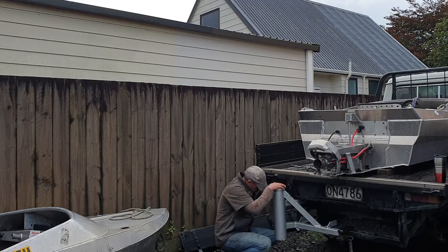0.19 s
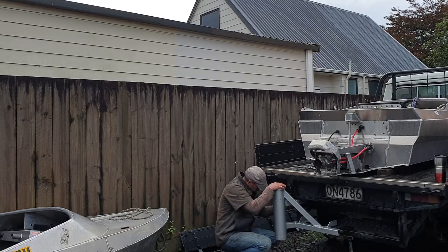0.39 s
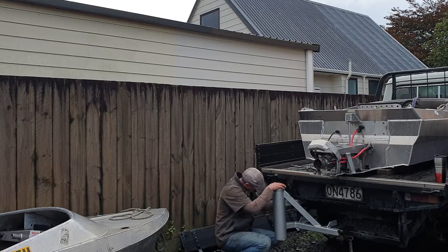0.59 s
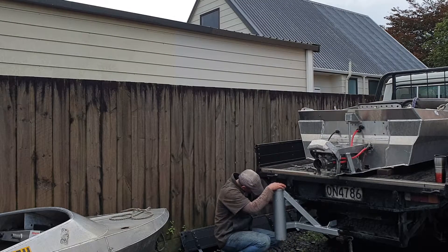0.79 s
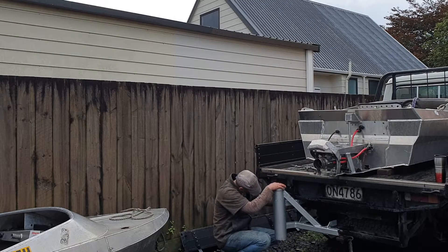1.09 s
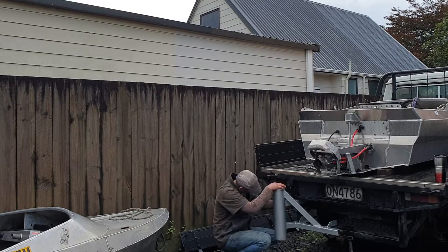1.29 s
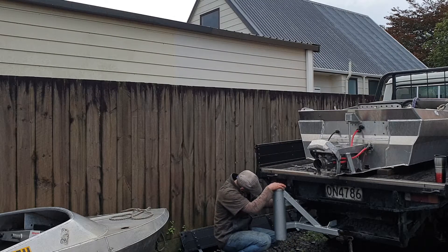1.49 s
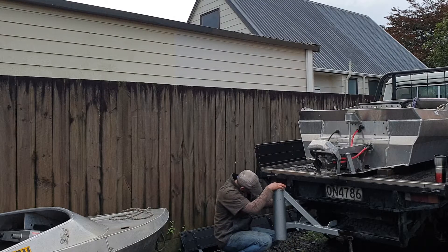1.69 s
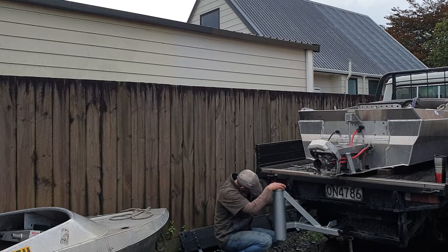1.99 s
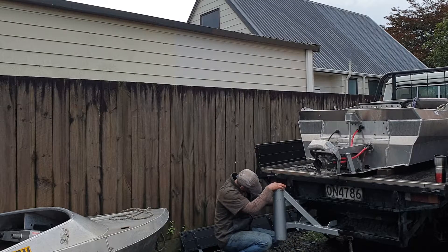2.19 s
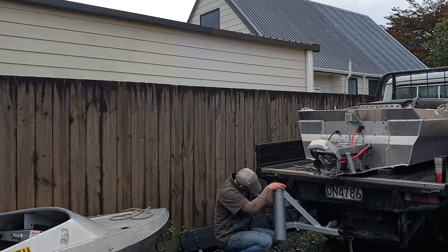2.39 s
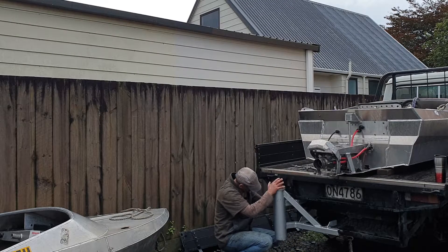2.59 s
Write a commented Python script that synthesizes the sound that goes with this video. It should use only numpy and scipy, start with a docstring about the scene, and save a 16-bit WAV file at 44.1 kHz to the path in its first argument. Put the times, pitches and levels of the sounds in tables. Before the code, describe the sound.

Brief piercing metal squeaks come in uneven bursts, first slightly lower, then higher, with grinding, low thuds and light knocks between pauses; outdoors, short echoes from fence and walls, faint distant town rumble, heard from a few metres.

```python
"""A fenced yard: a steel post is worked to and fro by hand in its socket, a few metres away.
The dry joint sticks and slips, locking onto high modes of the tube: squeaks, built from jittered harmonics.
Each stroke grinds and thuds (random clicks through resonances), with knocks and two small metal ticks.
Fence and house walls give a short tail (decaying noise) over a distant town rumble (shaped noise)."""
import sys
import numpy as np
from scipy import signal
from scipy.fft import rfft, irfft
from scipy.io import wavfile
from scipy.ndimage import uniform_filter1d

SR = 44100
rng = np.random.default_rng(int(sys.argv[2]) if len(sys.argv) > 2 else 0)


def natural_amplitude(level_db):
    """Convert a level in decibels to a linear amplitude factor, elementwise."""
    exponent = np.asarray(level_db, float) / 20
    return 10 ** exponent


def wav_out(sig):
    """Save sig, one row per channel (or a flat mono array), as 16-bit PCM at SR to the path in sys.argv[1]."""
    wavfile.write(sys.argv[1], SR, np.round(np.clip(np.atleast_2d(sig).T, -1, 1) * 32767).astype(np.int16))


N = 119070
T = np.arange(N) / SR

# Town spectrum, relative: pitch_hz, density_db (per Hz)
TOWN_SPECTRUM = [(21, -28.5), (36, -4), (83, 2), (157, -9.5), (183, -7.5), (517, -16), (777, -16),
                 (1390, -32.5), (1620, -32), (4590, -42.5), (5920, -41), (10300, -52.5), (15500, -42)]
# Town balance: pitch_hz, left_minus_right_db
TOWN_BALANCE = [(60, 5), (110, 1.5), (200, 3.5), (700, 5.5), (2380, -4.5), (8120, 14), (15000, 2)]
# Town width: pitch_hz, likeness of left and right (-1 to 1)
TOWN_LIKENESS = [(60, 0.92), (130, 0.95), (290, 0.74), (640, 0.21), (1410, -0.14), (3100, -0.33),
                 (6820, 0.3), (15000, 0.45)]
# Microphone response to the post and its echoes: pitch_hz, gain_db
MIC_RESPONSE = [(20, -8), (45, -2.5), (7000, 4), (8000, -4.5), (9300, -18), (10300, 1), (11000, -2),
                (13500, -7), (15500, -7.5)]
# Resonances of the frame: pitch_hz, width_hz, level_db
FRAME_MODES = [(96.5, 15, -2), (135.4, 13, 6.5), (148.3, 22, -2.5), (195.3, 26, 1), (237.1, 31, -4),
               (268, 31, -4.5), (302.4, 28, -1), (379.5, 90, -8.5), (772, 54, -11.5), (907, 42, -12.5),
               (1870, 540, -23)]
# Knocks of the post against its socket: start_s, peak_db, pitch_hz (around which the blow drives the frame)
SOCKET_KNOCKS = [(.349, -41, 800), (.362, -44, 780), (.408, -43, 790), (1.771, -43, 760), (1.798, -44, 750),
                 (1.873, -40, 830), (2.35, -38, 290), (2.373, -34, 310), (2.385, -33, 300),
                 (2.416, -34, 270)]
# Grinding, one list per stroke: time_s, thud_db, scrape_db, rasp_db (the last two against the thud)
STROKE_CURVES = [
    [(0.15, -59, -25.5, -13), (0.192, -51.5, -12, -28.5), (0.248, -50, -9.5, -6.5), (0.296, -49, -18, -14),
     (0.338, -48, -10.5, -17), (0.376, -44.5, -14.5, -19.5), (0.396, -47, -9.5, -15),
     (0.5, -48.5, -27, -20), (0.638, -65, -15.5, -9.5), (0.8, -76.5, -10, -14.5)],
    [(1.07, -65, -27.5, -39), (1.108, -51.5, -36.5, -29.5), (1.142, -46.5, -23, -13.5),
     (1.176, -36, -21, -24.5), (1.28, -42, -25, -25.5), (1.332, -51, -29.5, -38), (1.392, -58.5, -33, -41),
     (1.5, -62, -40.5, -47.5)],
    [(1.7, -55.5, -26, -33), (1.736, -57.5, -26, -20), (1.758, -48, -18.5, -18), (1.79, -53, -15.5, -23),
     (1.806, -49.5, -19, -11.5), (1.828, -46.5, -20, -17), (1.878, -41.5, -18, -18.5),
     (1.916, -45, -31.5, -39), (1.97, -52, -39, -31)],
    [(2.32, -62, -29, -18.5), (2.34, -61, -12.5, -14), (2.352, -46.5, -4.5, -5.5), (2.378, -41, -10, -12.5),
     (2.41, -44, -17, -18), (2.442, -40.5, -23, -14.5), (2.474, -41, -22.5, -23), (2.52, -49, -30, -26),
     (2.642, -70, -30, -11.5), (2.7, -50, -38.5, -26)],
]
# Tone of the scrape: pitch_hz, gain_db
SCRAPE_TONE = [(900, 0.5), (1400, -5), (1800, -1.5), (2250, -4.5), (2800, -7.5), (3300, -23), (5000, -51.5)]
# Tone of the rasp: pitch_hz, gain_db
RASP_TONE = [(2500, -41), (3300, -6.5), (5200, -3.5), (7500, -8), (9000, -12.5), (12000, -0.5),
             (15500, -22)]
# Bands where the grit rings: pitch_hz
GRIT_BANDS = [1930, 3080, 3500, 3880, 4420, 4790, 5170]
# Two small clicks of metal: start_s
TICK_STARTS = [1.36, 1.372]
# Low squeak, first lock: time_s, slip_hz, level_db of multiples 1 to 4, left_minus_right_db
LOW_SQUEAK_FIRST = [(.218, 2890, -67.5, -80, -81, -80.5, -7), (.225, 3065, -40, -58, -64.5, -71.5, -12),
                    (.235, 3027, -36.5, -42, -52, -55, -13), (.243, 3095, -34.5, -30, -40, -48.5, -8.5),
                    (.262, 2976, -47, -63, -54, -55.5, -1.5)]
# Low squeak, second lock: same columns
LOW_SQUEAK_SECOND = [(0.245, 3630, -51.5, -45, -61.5, -60.5, -8.5),
                     (0.253, 3628, -33, -26, -33.5, -51.5, -11.5), (.259, 3640, -29, -40, -36, -50, -9.5),
                     (.266, 3574, -33.5, -17.5, -35, -46, -8), (0.272, 3500, -23, -35.5, -38.5, -49, -2.5),
                     (0.28, 3482, -19.5, -27, -40, -49.5, -1.5), (0.293, 3432, -25, -43, -34, -53.5, -2.5),
                     (0.306, 3440, -19.5, -36.5, -54, -57, -6.5), (0.322, 3404, -35.5, -54, -53, -60, -1),
                     (0.329, 3426, -44, -55.5, -56.5, -65, -3)]
# Tube mode singing along with the low squeak: time_s, pitch_hz, level_db, left_minus_right_db
SINGING_MODE = [(0.233, 3720, -51, -12.5), (0.243, 3744, -22.5, -9.5), (0.261, 3778, -19.5, 2.5),
                (0.296, 3732, -37.5, 1), (0.318, 3610, -55.5, 1.5)]
# High squeaks, one list per lock: time_s, level_db, slip_hz, octave_db (against level_db),
# left_minus_right_db, roughness (0-1)
HIGH_SQUEAKS = [
    [(0.409, -58, 5760, -22, 1, 0.1), (0.415, -31.5, 5748, -11, 9, 0.05),
     (0.425, -30.5, 5656, -6.5, 16.5, 0.03), (0.449, -21, 5845, -21.5, 4, 0),
     (0.461, -39, 5810, 3.5, 4.5, 0.2), (0.47, -41, 5600, -5, 6.5, 0.25)],
    [(1.095, -63.5, 5900, -23.5, -9.5, 0.25), (1.111, -67.5, 5715, -30.5, -8.5, 0.3),
     (1.129, -21.5, 5870, -3.5, 6, 0.07), (1.153, -23, 5860, -5, 10.5, 0.16),
     (1.159, -31, 5923, 9.5, 10.5, 0.5), (1.171, -28, 5975, -1.5, 7, 0.5),
     (1.203, -29.5, 5735, -19, 11.5, 0), (1.209, -50, 5650, -11, 12, 0), (1.23, -40, 5760, -15, 8, 0)],
    [(1.15, -56.5, 6136, 2, 7, 0.3), (1.175, -37.5, 6332, -3.5, 6.5, 0.7),
     (1.215, -49, 6200, 6.5, 8.5, 0.3), (1.235, -60, 6175, 2, 8.5, 0.6)],
    [(1.772, -64.5, 5920, -30, 11.5, 0.4), (1.78, -37.5, 5907, -21.5, 9.5, 0),
     (1.79, -31, 5890, -9, 9.5, 0.2), (1.8, -17.5, 5900, -9, 3, 0.3), (1.81, -14.5, 6020, -6.5, 5, 0.17),
     (1.824, -15.5, 6061, -11.5, 5, 0), (1.834, -27, 6020, -1, -2.5, 0), (1.86, -27, 6020, -5, 8.5, 0.25)],
    [(2.328, -78, 6100, -25.5, 1.5, 0.2), (2.336, -41.5, 5835, -26.5, 11.5, 0.1),
     (2.346, -37, 5908, 9, 4, 0.5), (2.354, -25.5, 5960, 3, 5, 0.25), (2.364, -33, 5858, 14, 6.5, 0),
     (2.376, -30, 5936, -0.5, 11, 0.54), (2.404, -32.5, 5790, -0.5, 4, 0),
     (2.43, -29, 5660, -10.5, 17.5, 0.4), (2.46, -45.5, 5716, -9.5, 1.5, 0.16),
     (2.476, -44, 5390, -19, -1, 0.1), (2.52, -74.5, 5980, -17.5, 3, 0.2)],
]
# Faint thin tones: start_s, length_s, from_hz, to_hz, level_db
FAINT_TONES = [(.187, .028, 2650, 2620, -63), (.585, .05, 2850, 2830, -72), (1.22, .085, 3500, 3480, -62),
               (1.705, .05, 4750, 4620, -75), (1.97, .25, 4720, 4840, -77)]
# Tube modes that ring on: pitch_hz, level_db, t60_s
TUBE_MODES = [(3440, -16.5, 0.47), (5400, -11, 0.22), (5300, -11, 1), (5766, -17.5, 0.73), (6180, -22, .45),
              (6075, -10.5, .55)]

TOWN_DB = -55.5
YARD_TAIL_DB, YARD_T60_S, YARD_TREBLE_T60_S = -13.5, 0.37, 0.32
EARLY_DB, EARLY_DECAY_S = -12, 0.012  # decay to 1/e
YARD_GAP_S, YARD_BASS_CUT_HZ = 0.006, 350
BUMPS_PER_S, GRIT_PER_S, BUMP_LOWPASS_HZ = 600, 4700, 580
GRIT_BAND_WIDTH_HZ, GRIT_BAND_DB, GRIT_BAND_SWING_DB = 65, 4, 5
THUD_SIDE, GRIT_SIDE = 0.15, 0.42  # side against mid, ahead of the side filter
STROKE_PAN_DB, TICK_DB = 4, -55
LEFT_LAG_SAMPLES = 3
JITTER = 0.006  # rms share of the slip rate at full roughness
LOW_ROUGHNESS, OVERTONE_ROUGHNESS = 0.08, 0.25  # the second is added with each higher multiple
FLUTTER_HZ = 139  # bandwidth, times the multiple
SKIRT_DB, SKIRT_HZ, SKIRT_LEAN_HZ = -11, 567.5, 199.2  # lean grows with the multiple


def unit(x):
    """Scale to rms 1."""
    return x / np.sqrt(np.mean(np.abs(x) ** 2))


def at_hz(table, hz):
    """Read (Hz, value) points on a log-frequency axis."""
    table = np.array(table, float)
    return np.interp(np.log(hz + 1), np.log(table[:, 0] + 1), table[:, 1])


def colour(x, table):
    """Shape a spectrum by (Hz, dB) points."""
    return irfft(rfft(x) * natural_amplitude(at_hz(table, np.fft.rfftfreq(N, 1 / SR))), N)


def wander(hz):
    """Random drift with a given bandwidth, rms 1."""
    sos = signal.butter(3, hz, fs=SR, output="sos")
    return unit(signal.sosfilt(sos, rng.standard_normal(N)))


def ring(x, hz, width_hz):
    """One resonance, gain 1 at its centre."""
    return signal.lfilter(*signal.iirpeak(hz, hz / width_hz, fs=SR), x)


def pan(x, db):
    """Place a sound by its left-right level difference; the mean of both keeps its level."""
    left = natural_amplitude(db) / (1 + natural_amplitude(db))
    right = 1 - left
    return 2 * x * np.array([left, right]).reshape(2, -1)


def town():
    """Distant rumble and hiss: shaped noise that swells slowly, its bass alike left and right."""
    hz = np.fft.rfftfreq(N, 1 / SR)
    alike = np.clip(at_hz(TOWN_LIKENESS, hz), 0, 0.93)
    mid, side = rfft(rng.standard_normal((2, N)))
    mid = mid * np.sqrt(1 + alike)
    side = side * np.sqrt(1 - alike)
    tilt = natural_amplitude(at_hz(TOWN_BALANCE, hz) / 2)
    spectrum = np.array([(mid + side) * tilt, (mid - side) / tilt])
    rumble = irfft(spectrum * natural_amplitude(at_hz(TOWN_SPECTRUM, hz)), N)
    return natural_amplitude(TOWN_DB + 0.32 * wander(0.43)) * unit(rumble)


def yard(x):
    """Early echoes, then a tail off fence and walls whose treble dies first; the open sky takes the bass."""
    t = T[:SR]
    tail_noise, early_noise, picker = rng.standard_normal((3, 2, SR))
    low = signal.sosfilt(signal.butter(2, 8500, fs=SR, output="sos"), tail_noise)
    high = tail_noise - low
    tail = low * natural_amplitude(-60 * t / YARD_T60_S) + high * natural_amplitude(-60 * t / YARD_TREBLE_T60_S)
    # sparse spikes stand for single reflections
    early = early_noise * (np.abs(picker) > 2.5) * np.exp(-t / EARLY_DECAY_S)

    def level_and_gap(response):
        return response * (t > YARD_GAP_S) / np.sqrt(np.sum(response ** 2) / 2)

    echo = natural_amplitude(YARD_TAIL_DB) * level_and_gap(tail) + natural_amplitude(EARLY_DB) * level_and_gap(early)
    thin = signal.sosfilt(signal.butter(2, YARD_BASS_CUT_HZ, "high", fs=SR, output="sos"), x)
    return signal.fftconvolve(thin, echo, axes=1)[:, :N]


def frame(x):
    """The frame's resonances side by side, with alternating sign."""
    out = 0
    for k, (hz, width_hz, db) in enumerate(FRAME_MODES):
        out = out + (-1) ** k * natural_amplitude(db) * ring(x, hz, width_hz)
    return out


def knocks():
    """Single blows, each a short push that rings the part of the frame near its pitch."""
    out = 0
    for start, db, hz in SOCKET_KNOCKS:
        impulse = 1.0 * (np.arange(N) == int(start * SR))
        push = ring(ring(impulse, hz, hz / 2), hz, hz / 2)
        blow = frame(push)
        out = out + natural_amplitude(db) * blow / np.max(np.abs(blow))
    return pan(out, STROKE_PAN_DB)


def clicks(rate):
    """Random contacts at a mean rate per second over a bed of fine noise, in two rows (mid, side)."""
    hits = (rng.random((2, N)) < rate / SR) * rng.standard_normal((2, N))
    return hits + 0.072 * rng.standard_normal((2, N))


def ticks():
    """Small clicks of metal: decaying noise bursts through two high resonances."""
    envelope = sum(np.exp(-np.abs(T - start) / 0.0078) * (T > start) for start in TICK_STARTS)
    burst = envelope * rng.standard_normal(N)
    return natural_amplitude(TICK_DB) * (ring(burst, 9800, 1400) + ring(burst, 12000, 4000))


def strokes():
    """Uneven bumps thud through the frame; fine grit scrapes and rasps above them, spread wider."""
    time, thud_db, scrape_db, rasp_db = np.concatenate(STROKE_CURVES).T
    moving = sum(1.0 * ((T > rows[0][0]) & (T < rows[-1][0])) for rows in STROKE_CURVES)
    gate = uniform_filter1d(moving, size=900)

    lowpass = signal.butter(2, BUMP_LOWPASS_HZ, fs=SR, output="sos")
    thud = unit(frame(signal.sosfilt(lowpass, clicks(BUMPS_PER_S))))

    grit = clicks(GRIT_PER_S) * natural_amplitude(1.4 * wander(40))
    bands = 0
    for hz in GRIT_BANDS:
        swing = natural_amplitude(GRIT_BAND_DB + GRIT_BAND_SWING_DB * wander(8.9))  # each band comes and goes
        bands = bands + swing * ring(grit, hz, GRIT_BAND_WIDTH_HZ)
    grit = grit + bands
    scrape = natural_amplitude(np.interp(T, time, scrape_db)) * unit(colour(grit, SCRAPE_TONE))
    rasp = natural_amplitude(np.interp(T, time, rasp_db)) * unit(colour(grit, RASP_TONE))

    grind = thud * [[1], [THUD_SIDE]] + (scrape + rasp) * [[1], [GRIT_SIDE]]
    mid, side = gate * natural_amplitude(np.interp(T, time, thud_db)) * grind
    side = colour(side, [(100, -21.0), (400, 10)])  # narrow bass, wide above
    return pan(mid + ticks(), STROKE_PAN_DB) + side * [[1], [-1]]


def slip(t, hz, orders_db, pan_db, rough):
    """Stick-slip cycles: multiples of a jittered rate, fluttering in size, each with a skirt leaning upward."""
    def read(values):
        return np.interp(T, t, values)

    share = np.clip(read(rough + 0 * t), 0, 1)
    phase = 2 * np.pi * np.cumsum(read(hz) * (1 + JITTER * share * wander(360))) / SR
    gate = uniform_filter1d(1.0 * ((T > t[0]) & (T < t[-1])), size=130)
    out = 0
    for order, db in enumerate(orders_db, 1):
        if order > 1:  # rougher with each multiple
            share = np.clip(share + OVERTONE_ROUGHNESS, 0, 1)
        steady = np.sqrt(1 - share)
        flutter = wander(FLUTTER_HZ * order) + 1j * wander(FLUTTER_HZ * order)
        flutter = flutter * np.sqrt(share / 2)
        skirt = wander(SKIRT_HZ) + 1j * wander(SKIRT_HZ)
        skirt = natural_amplitude(SKIRT_DB) * share * skirt * np.exp(2j * np.pi * order * SKIRT_LEAN_HZ * T)
        cycle = np.real((steady + flutter + skirt) * np.exp(1j * order * phase))
        out = out + natural_amplitude(read(db)) * cycle
    return pan(np.sqrt(2) * gate * out, read(pan_db + 0 * t))


def squeaks():
    """All locks of the joint, the faint tones, and the tube modes that they leave ringing."""
    out = 0
    for rows in (LOW_SQUEAK_FIRST, LOW_SQUEAK_SECOND, SINGING_MODE):
        t, hz, *orders_db, pan_db = np.array(rows, float).T
        out = out + slip(t, hz, orders_db, pan_db, LOW_ROUGHNESS)
    for rows in HIGH_SQUEAKS:
        t, db, hz, octave_db, pan_db, rough = np.array(rows, float).T
        out = out + slip(t, hz, [db, db + octave_db], pan_db, rough)
    for start, length, from_hz, to_hz, db in FAINT_TONES:
        ends = np.array([start, start + length])
        out = out + slip(ends, [from_hz, to_hz], [[db, db]], 2.0, 0.4)
    ringing = 0
    for hz, db, t60 in TUBE_MODES:
        width_hz = np.log(1000) / (np.pi * t60)
        ringing = ringing + natural_amplitude(db) * ring(out, hz, width_hz)
    return out + ringing


def scene():
    """The post and its yard echoes through the microphone response, over the town."""
    post = squeaks() + strokes() + knocks()
    post[0] = np.roll(post[0], LEFT_LAG_SAMPLES)  # the left side hears the post late
    near = colour(post + yard(post), MIC_RESPONSE)
    return near + town()


def top_cut(x):
    """Nothing passes above the cut-off."""
    return signal.sosfilt(signal.butter(12, 15680, fs=SR, output="sos"), x)


def record(dry):
    """Deliver the finished mix."""
    return top_cut(dry)


dry = scene()
out = record(dry)
wav_out(out)
```